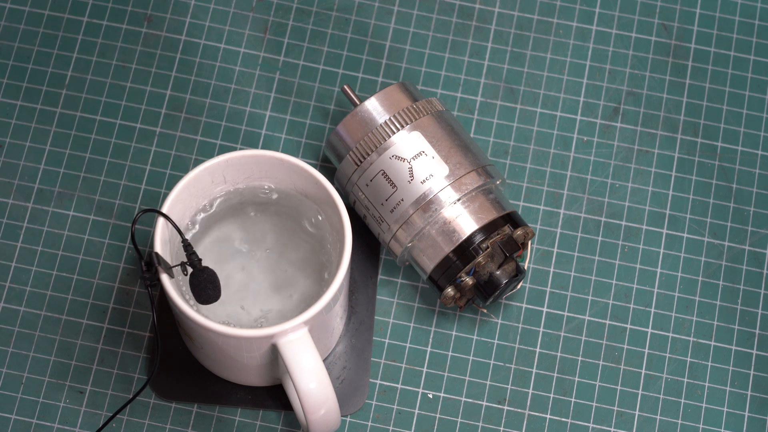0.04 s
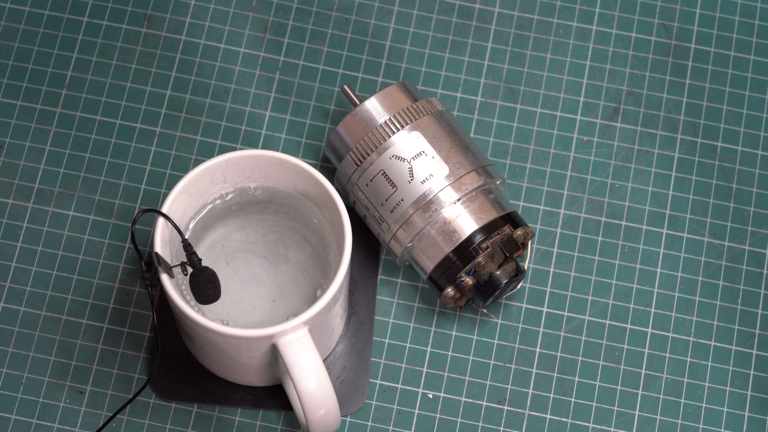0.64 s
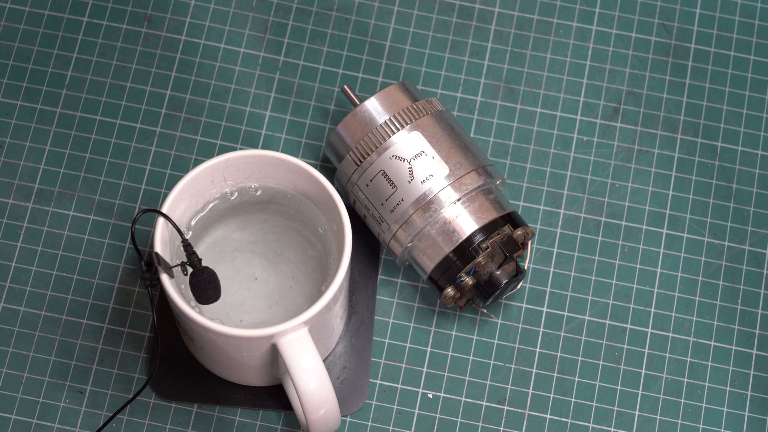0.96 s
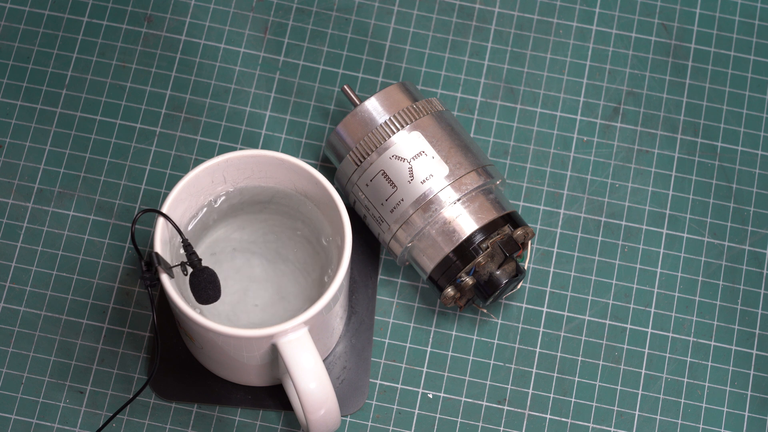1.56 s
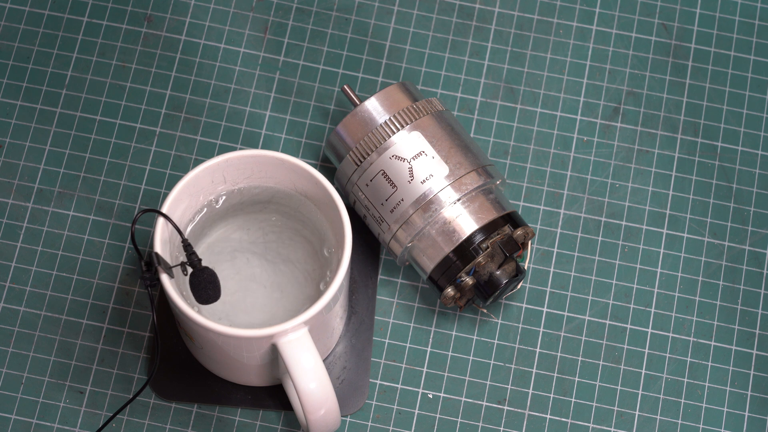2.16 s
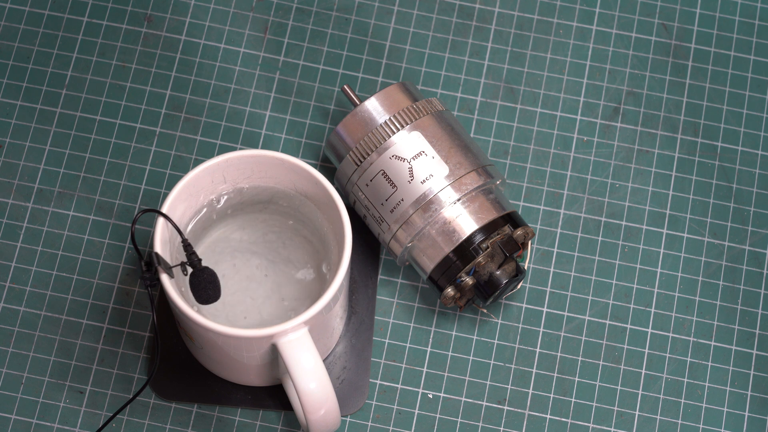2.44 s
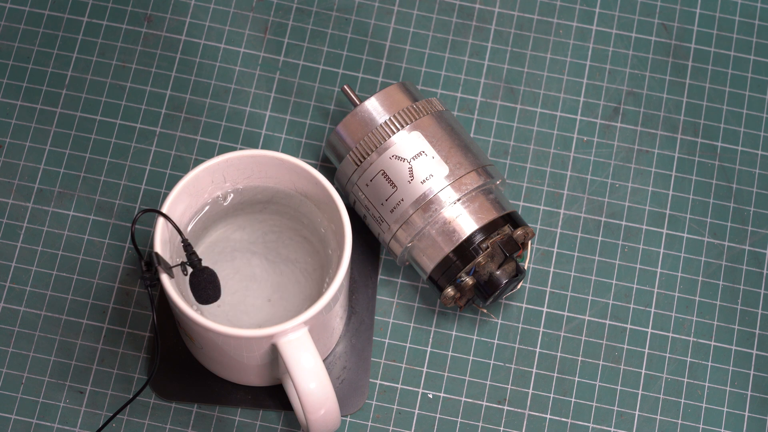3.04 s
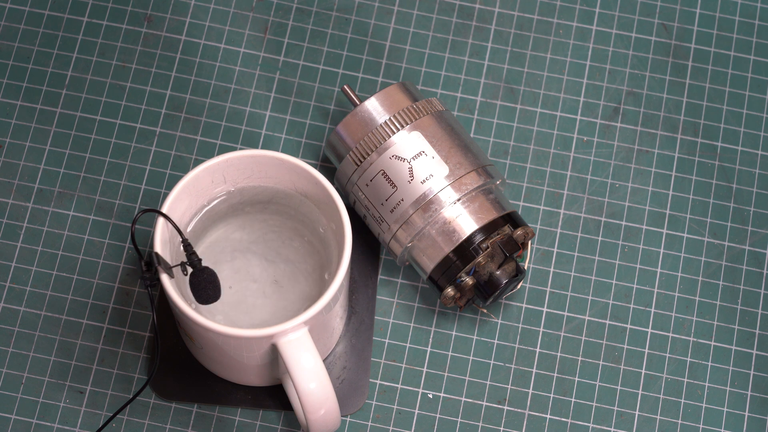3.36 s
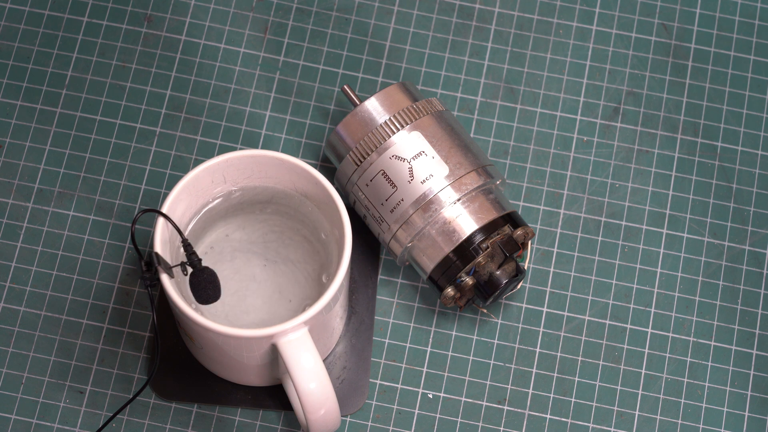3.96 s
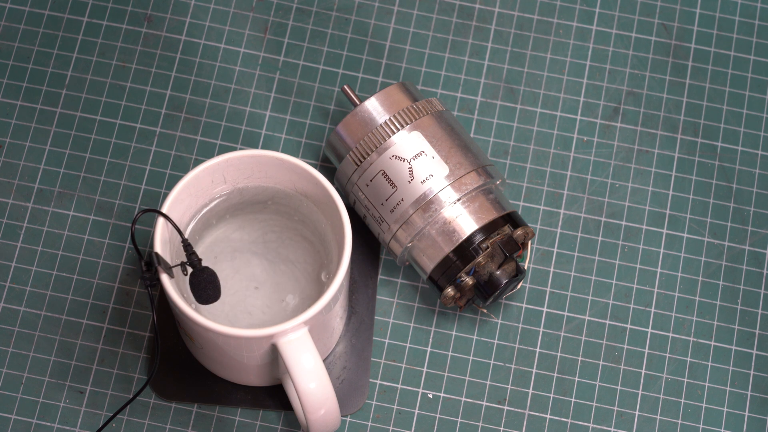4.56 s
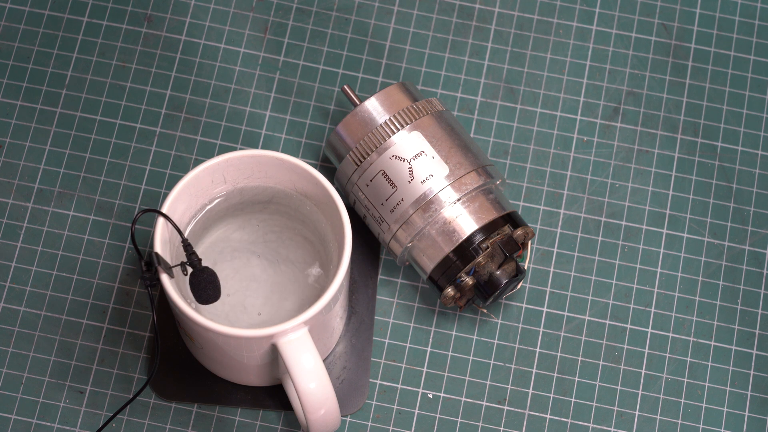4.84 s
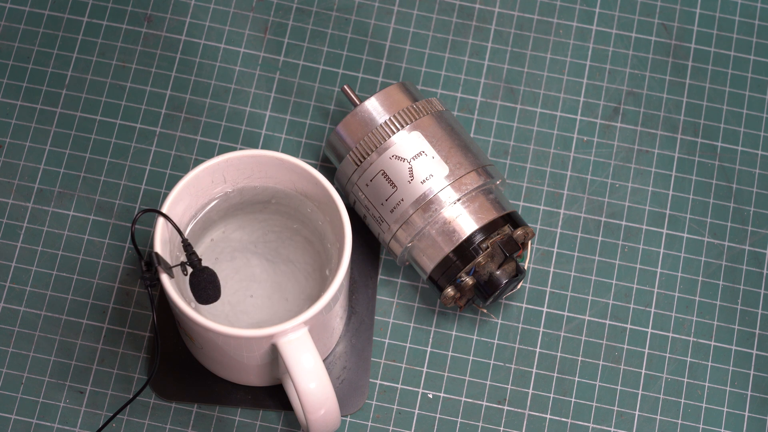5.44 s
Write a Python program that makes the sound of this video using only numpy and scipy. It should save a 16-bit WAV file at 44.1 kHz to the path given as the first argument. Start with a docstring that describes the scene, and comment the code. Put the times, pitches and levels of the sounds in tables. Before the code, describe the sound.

Sparkling water fizzes in a ceramic mug, heard by a small microphone just inside the rim. Countless tiny bubbles burst in a dense, high crackle over a thin hiss, with sharper little pops standing out and a few soft, dull plops. The mug adds a slight hollow ring. The fizz is liveliest at first, then eases a little but keeps going, over faint room noise and hum.

```python
"""Inside the rim of a ceramic mug, a small microphone hears freshly poured sparkling water fizz.
Thousands of tiny bubbles burst at the surface, each a rising chirp about a millisecond long.
Snapping bubble skins tick, the finest bubbles blur into a hiss, and a few big ones plop.
The air in the mug and its wall ring along, over faint room noise, hum and a deep rumble."""
import sys
import numpy as np
from scipy import signal
from scipy.fft import rfft, irfft
from scipy.io import wavfile
from scipy.ndimage import uniform_filter1d

SR = 44100
rng = np.random.default_rng(int(sys.argv[2]) if len(sys.argv) > 2 else 0)


def wav_out(sig):
    """Save sig, one row per channel (or a flat mono array), as 16-bit PCM at SR to the path in sys.argv[1]."""
    wavfile.write(sys.argv[1], SR, np.round(np.clip(np.atleast_2d(sig).T, -1, 1) * 32767).astype(np.int16))


N = 247401


def from_db(db):
    """Turn decibels into a number to multiply by."""
    return 10 ** (np.asarray(db) / 20)


def rms_one(x):
    """Scale a sound to an average strength (rms) of 1."""
    return x / np.sqrt(np.mean(x ** 2) + 1e-20)


def at_hz(points, hz):
    """Look up the level at a pitch, sliding between the rows of a table."""
    pitches, levels = np.transpose(points)
    return np.interp(np.log(hz), np.log(pitches), levels)


def resonance(x, hz, width_hz):
    """Keep the part of a sound near one pitch; a narrower band rings longer."""
    r = np.exp(-np.pi * width_hz / SR)
    feedback = [1, -2 * r * np.cos(2 * np.pi * hz / SR), r * r]
    return signal.lfilter(np.array([1, 0, -1]) * (1 - r * r) / 2, feedback, x)


def band_noise(low_hz, high_hz):
    """Noise between two pitches."""
    band = signal.butter(2, [low_hz, high_hz], "band", fs=SR, output="sos")
    return signal.sosfilt(band, rng.standard_normal(N))


def drift(rate_hz):
    """A smooth random wobble, worked out at every 40th sample."""
    r = np.exp(-80 * np.pi * rate_hz / SR)
    slow = signal.lfilter([1], [1, -2 * r, r * r], rng.standard_normal(N // 40 + 2002))[2000:]
    return np.interp(np.arange(N) / 40, np.arange(len(slow)), rms_one(slow))


def clumps(depth_db, rate_hz, refill_s):
    """Bubbles give way in brief clumps; their supply is steady, so a lull makes up for each clump."""
    surge = drift(rate_hz)
    surge = rms_one(surge - uniform_filter1d(surge, int(refill_s * SR)))
    return from_db(depth_db * np.clip(surge, -2.2, 2.2))


def burst_times(per_s, clumping):
    """Pick random moments for bursts, more of them during a clump."""
    chance = np.cumsum(clumping)
    return np.interp(rng.random(int(per_s * N / SR)), chance / chance[-1], np.arange(N) / SR)


def bursts(starts, peak_db, hz, ms, glide, swell):
    """Each bubble is a tiny bottle: as its skin tears open, its note swells, rises and dies."""
    length = np.clip(ms, .05, 6) * SR / 1000
    samples = (2 * length).astype(int) + 2
    bubble = np.repeat(np.arange(len(starts)), samples)   # which bubble owns each sample
    age = np.arange(len(bubble)) - np.repeat(np.cumsum(samples) - samples, samples)
    progress = age / length[bubble]
    shape = progress ** swell * np.exp(-2 * progress ** 2)
    turns = hz[bubble] / SR * age * (1 + glide * (progress - 1) / 2)
    wave = from_db(peak_db)[bubble] * shape / shape.max() * np.sin(2 * np.pi * turns)
    position = np.maximum(starts * SR, 0).astype(int)[bubble] + age
    return np.bincount(position, wave, N)[:N]


def echoing_bursts(starts, peak_db, hz, ms, glide, swell, echoes):
    """Each bubble sits in its own spot, so its sound bounces off the walls with its own delays."""
    echo_db, average_delay_ms = -8.5, 1.3
    out = np.zeros(N)
    for bounce in range(1 + echoes):
        out += bursts(starts, peak_db + bounce * echo_db, hz, ms, glide, swell)
        starts = starts + average_delay_ms * (.5 + rng.exponential(.5, len(starts))) / 1000
    return out


# How lively the fizz is: it settles after the pour and picks up a little late on.
# Each row: time in seconds, level of coarse bubbles in dB, level of fine bubbles in dB.
FIZZ_LEVELS = [(0.0, -31.5, -32), (0.28, -30.5, -33.5), (0.45, -33.5, -33.5), (1.15, -34, -32),
               (2.05, -37.4, -34), (3.2, -34.5, -33.5), (3.9, -37, -33), (4.15, -37, -36.5),
               (4.95, -36, -36.5), (5.45, -35, -34.8)]
COARSE_HZ, FINE_HZ = 7800, 9950


def fizz_db(seconds, hz):
    """How strong the fizz is at a moment and pitch, blending coarse and fine bubbles."""
    times, coarse, fine = np.transpose(FIZZ_LEVELS)
    fineness = np.clip(np.log(hz / COARSE_HZ) / np.log(FINE_HZ / COARSE_HZ), 0, 1)
    return (1 - fineness) * np.interp(seconds, times, coarse) + fineness * np.interp(seconds, times, fine)


# How strongly small bubbles burst. Each row: pitch in Hz, boost or cut in dB.
STRENGTH_BY_PITCH = [(2500, -24), (4000, -8.5), (5000, -4), (6500, 0), (8500, -0.5), (10500, 4.5),
                     (13000, 2), (16000, -1.5)]


def fizz(clumping, per_s, level_db, spread_db, size_cap, centre_hz, octaves):
    """Small bubbles burst, many faint and a few strong; each rings for about eight vibrations."""
    starts = burst_times(per_s, clumping)
    size, pitch, life = rng.standard_normal((len(starts), 3)).T
    hz = np.clip(centre_hz * 2 ** (octaves * pitch), 2000, 18000)
    size_db = spread_db * np.minimum(size, size_cap)
    peak_db = level_db + fizz_db(starts, hz) + at_hz(STRENGTH_BY_PITCH, hz) + size_db
    cycles = 8 * np.exp(.25 * np.clip(life, -2, 2) + .06 * size)
    return echoing_bursts(starts, peak_db, hz, 1000 * cycles / hz, glide=.04, swell=.5, echoes=2)


def ticks(clumping, per_s, level_db, spread_db, centre_hz, ms):
    """Bubble skins that snap all at once give clicks about one vibration long."""
    starts = burst_times(per_s, clumping)
    size, pitch = rng.standard_normal((len(starts), 2)).T
    hz = np.minimum(centre_hz * 2 ** (.5 * np.maximum(pitch, -2)), SR / 3)
    peak_db = level_db + fizz_db(starts, hz) + spread_db * np.minimum(size, 2.3)
    return echoing_bursts(starts, peak_db, hz, np.full(len(starts), ms), glide=.18, swell=.27, echoes=1)


def hiss(clumping, level_db, low_hz, high_hz):
    """The finest bubbles blur into a thin hiss that flutters with the clumps."""
    flutter = rms_one(band_noise(low_hz, high_hz) * clumping)
    return from_db(level_db + fizz_db(np.arange(N) / SR, FINE_HZ)) * flutter


def stray_pops(per_s, level_db, spread_db, low_hz, high_hz, db_per_octave, cycles):
    """Medium bursts stand out of the fizz; the lower ones are softer and ring longer."""
    total = int(per_s * N / SR)
    when, pitch, size, life = rng.random((total, 4)).T
    starts = (np.arange(total) + when) / total * N / SR
    hz = low_hz * (high_hz / low_hz) ** pitch
    softening_db = db_per_octave * np.log2(np.minimum(hz / FINE_HZ, 1))
    peak_db = level_db + fizz_db(starts, hz) + softening_db + spread_db * (size - .5)
    ms = 1000 * cycles * 2 ** (life - .5) / hz
    return echoing_bursts(starts, peak_db, hz, ms, glide=.05, swell=.33, echoes=1)


# The notes of the air in the mug, and one narrow note of its wall.
# Each row: pitch in Hz, width in Hz, level in dB above the direct sound.
MUG_NOTES = [(1710, 340, 0.5), (2406, 10, 15), (3377, 290, 10.5), (4990, 205, 10.5), (6540, 170, 9),
             (8155, 256, 7), (9660, 490, -0.5), (11400, 390, -3.5), (12900, 400, -1.5), (14500, 400, 2)]


def mug(water):
    """The bubbles are heard directly, and they also set the mug ringing."""
    return water + sum(from_db(db) * resonance(water, hz, width) for hz, width, db in MUG_NOTES)


# The tone of the room's noise. Each row: pitch in Hz, relative level in dB.
ROOM_TONE = [(22, -23), (45, -3), (130, 1.5), (200, -1.5), (320, -1.5), (550, -6), (1100, -8.5),
             (1650, -4.5), (2200, -5.5)]
# The steady notes of the hum. Each row: pitch in Hz, relative level in dB.
HUM_NOTES = [(50, -66), (300, -67.5), (347, -70), (744, -74), (844, -76)]


def room(noise_db, hum_db):
    """The room adds a dull, steady noise and a faint hum."""
    hz = np.maximum(np.arange(N // 2 + 1) * SR / N, 1)
    tone = from_db(at_hz(ROOM_TONE, hz)) / (1 + (hz / 3000) ** 4)
    noise = rms_one(irfft(rfft(rng.standard_normal(N)) * tone, N))
    t = np.arange(N) / SR
    hum = sum(from_db(db) * np.sqrt(2) * np.sin(2 * np.pi * (pitch * t + rng.random()))
              for pitch, db in HUM_NOTES)
    return from_db(noise_db) * noise + from_db(hum_db) * hum


# The loudest bursts.
# Each row: start in seconds, relative level in dB, pitch in Hz, ring time in milliseconds.
LOUD_POPS = [(0.043, -19, 7650, 0.7), (0.114, -22, 5130, 1.9), (0.151, -19, 8310, 1.0),
             (0.217, -20.5, 7730, 2.3), (0.2917, -23.5, 5220, 2), (0.5175, -25, 6570, 1.2),
             (0.6337, -25.5, 5270, 1.3), (0.7297, -18.5, 8300, 0.98), (0.816, -18, 8200, 1.0),
             (0.9645, -27.5, 6540, 1.9), (1.006, -18.5, 6140, 1.2), (1.0323, -17, 10850, 1.0),
             (1.0806, -19, 8300, 1.1), (1.1866, -31, 5300, 1.7), (1.2185, -26, 5650, 1.3),
             (1.3526, -17.5, 8720, 0.49), (1.4963, -24, 8060, 2), (1.6772, -23, 6800, 0.7),
             (1.8807, -15.5, 9710, 0.58), (1.9946, -36.5, 5060, 3.9), (2.1152, -19, 9410, 0.83),
             (2.2469, -15, 10400, 1.2), (2.7455, -21.5, 8610, 1.2), (2.8261, -31, 3650, 0.3),
             (2.9652, -22.5, 5620, 1.9), (3.1023, -21.5, 8400, 2.1), (3.2279, -14, 9370, 0.47),
             (3.2742, -18, 11000, 0.99), (3.294, -29.5, 6610, 2.7), (3.4326, -21, 9050, 0.7),
             (3.759, -30, 4670, 2.6), (3.8248, -21.5, 9950, 1.5), (3.9687, -14, 11900, 0.31),
             (4.2353, -20, 8100, 0.35), (4.3198, -18, 7960, 1), (4.4704, -28.5, 3650, 0.32),
             (4.662, -17.5, 9500, 0.47), (4.7824, -22, 7000, 0.97), (4.9221, -24.5, 6610, 1.7),
             (4.957, -23, 8060, 1.0), (5.1205, -18, 9560, 0.9), (5.3327, -20, 7700, 0.93),
             (5.346, -23, 6800, 2.9), (5.4615, -32, 5080, 1.9), (5.527, -19, 7400, 0.6),
             (5.5552, -14.5, 7670, 0.25)]


def loud_pops(level_db):
    """Bubbles burst close under the microphone."""
    starts, peak_db, hz, ms = np.transpose(LOUD_POPS)
    return echoing_bursts(starts, peak_db + level_db, hz, ms, glide=.05, swell=.36, echoes=1)


# Big bubbles giving way. Each row: start in seconds, relative level in dB, pitch in Hz.
BIG_BUBBLES = [(0.469, -36.5, 330), (0.805, -34.5, 260), (1.35, -36.5, 1640), (1.506, -39.5, 1730),
               (2.187, -40.5, 1500), (2.557, -41, 1360), (2.746, -32.5, 1810), (3.214, -35.5, 1630),
               (3.359, -40.5, 1560), (3.672, -40.5, 2380), (4.14, -39.5, 1470), (4.196, -34.5, 2190),
               (4.236, -42, 1900), (4.887, -35.5, 390)]


def plops(level_db, damping, dull_hz):
    """A big bubble gives a dull knock: one soft puff into a hollow that barely rings."""
    soften = signal.butter(2, dull_hz, fs=SR, output="sos")
    puff = signal.sosfilt(soften, signal.unit_impulse(SR // 20))
    out = np.zeros(N)
    for seconds, peak_db, hz in BIG_BUBBLES:
        knock = resonance(puff, hz, damping * np.sqrt(hz * dull_hz))
        start = round(seconds * SR)
        out[start:start + len(knock)] += from_db(peak_db + level_db) * knock / np.abs(knock).max()
    return out


# The rise and fall of the rumble. Each row: time in seconds, level in dB.
RUMBLE_LEVELS = [(0.0, -78), (2.2, -68), (3.0, -73), (3.3, -59.5), (3.7, -60.5), (4.1, -69)]


def rumble(low_hz, high_hz):
    """A deep, faint rumble in the room swells once."""
    level_db = np.interp(np.arange(N) / SR, *np.transpose(RUMBLE_LEVELS))
    return from_db(level_db) * rms_one(band_noise(low_hz, high_hz))


def scene():
    """Bubbles, mug and room reach one microphone, so both ears hear the same."""
    clumping = clumps(depth_db=4, rate_hz=110, refill_s=.06)
    water = fizz(clumping, per_s=2400, level_db=-7, spread_db=6, size_cap=1.93,
                 centre_hz=9490, octaves=.4156)
    water += ticks(clumping, per_s=2000, level_db=-7.5, spread_db=6.5, centre_hz=8570, ms=.19)
    water += ticks(clumping, per_s=14, level_db=-14.5, spread_db=5, centre_hz=2600, ms=.21)  # big skins
    water += hiss(clumping, level_db=-11.5, low_hz=4900, high_hz=15900)
    water += stray_pops(per_s=24, level_db=13.5, spread_db=1.5, low_hz=5430, high_hz=12840,
                        db_per_octave=10, cycles=9.6)
    water += loud_pops(level_db=.5)
    water += plops(level_db=4.5, damping=.72, dull_hz=2570)
    background = room(noise_db=-54.17, hum_db=-1.5) + rumble(low_hz=30, high_hz=66.7)
    return np.tile(mug(water) + background, (2, 1))


def record(dry):
    """The very highest pitches are cut off sharply."""
    cutoff_hz = 15750
    return signal.sosfilt(signal.ellip(12, .1, 80, cutoff_hz, fs=SR, output="sos"), dry)


dry = scene()
out = record(dry)
wav_out(out)
```